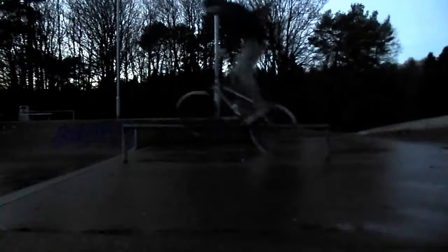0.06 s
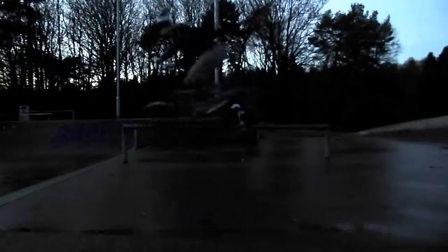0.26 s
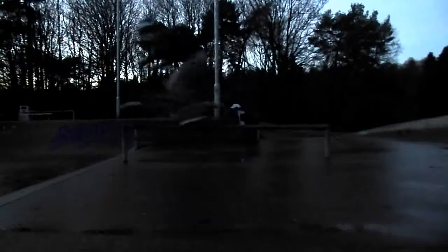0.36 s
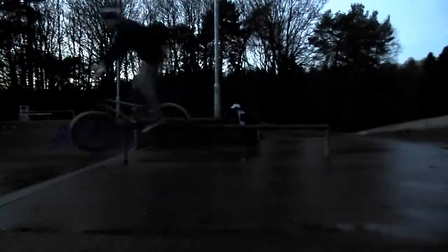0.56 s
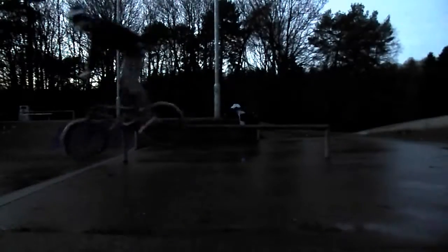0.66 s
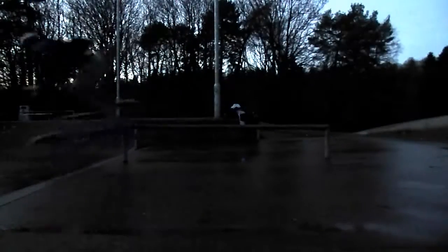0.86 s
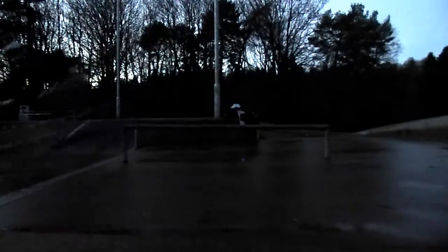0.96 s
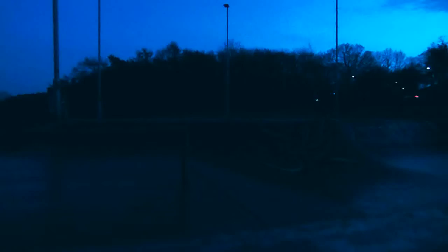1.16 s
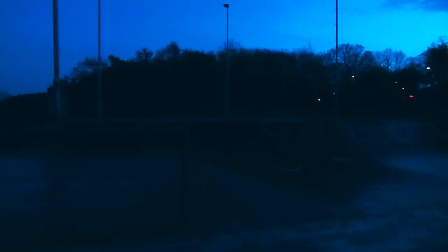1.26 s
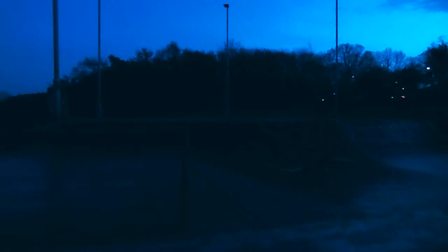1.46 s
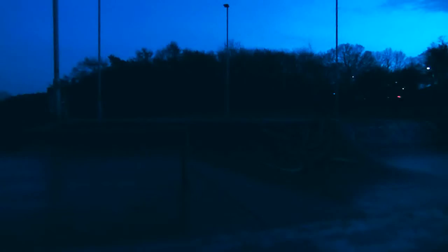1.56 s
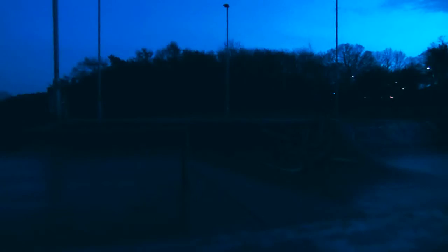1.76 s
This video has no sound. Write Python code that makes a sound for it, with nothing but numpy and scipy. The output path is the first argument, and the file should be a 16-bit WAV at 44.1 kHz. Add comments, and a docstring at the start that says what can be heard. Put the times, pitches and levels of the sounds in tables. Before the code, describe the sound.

Bike pegs strike a steel rail with a sharp clank and a brief ringing rattle in an outdoor skate park. A landing knock follows, with faint freewheel buzz, wet tyre hiss, far traffic and light wind on the microphone.

```python
"""A stunt bike's steel pegs clank onto a steel rail: the front one hits, the rear one lands and chatters.
Each hit thuds in the rail, clanks in the fork or frame and leaves the peg ringing briefly.
The freewheel's pawls buzz before and after; the bike drops off with a knock and hisses away on wet
concrete. Ramps and trees give a weak echo, far traffic hums and a little wind bumps the microphone."""
import sys
import numpy as np
from scipy import signal
from scipy.fft import rfft, irfft, next_fast_len
from scipy.io import wavfile
from scipy.ndimage import map_coordinates

SR = 44100
rng = np.random.default_rng(int(sys.argv[2]) if len(sys.argv) > 2 else 0)


def output_pcm(signal):
    """Save a mono or channel-first signal as 16-bit PCM at the path in sys.argv[1].

    Samples are clipped to [-1, 1] before scaling.
    """
    pcm = np.clip(np.atleast_2d(signal).T, -1, 1) * 32767
    wavfile.write(sys.argv[1], SR, np.round(pcm).astype(np.int16))


N = 79380

# peg hits on the rail: t/s, end of the bike, thud/dB, clank/dB, peg ring/dB, crack/dB
PEG_HITS = [(.213, "front", -22, -13, -19.5, -23.5), (.293, "front", -29.5, -28.5, -34.5, -49),
            (.3245, "rear", -26, -28, -52, -44), (.340, "rear", -28, -13, -20, -14),
            (.3475, "rear", -29.5, -14.5, -22.5, -17), (.353, "rear", -27, -11.5, -20.5, -19),
            (.361, "rear", -20, -15, -17.5, -21), (.369, "rear", -18, -36, -13.5, -34),
            (.376, "rear", -23.5, -28, -16.5, -45), (.3945, "rear", -38, -16, -23, -44),
            (.400, "rear", -22.5, -28, -17.5, -45)]
# ringing modes of rail, fork, frame, steel pegs, and tyre with rim: f/Hz, level/dB, t60/s
RAIL_MODES = [(305.8, -10, 0.3), (364, -10.5, 0.28), (512, -13.5, 0.27), (576, -10.5, 0.56),
              (628, -11, 0.31), (921, -16, .5)]
FORK_MODES = [(295, -0.5, 0.13), (898, -4.5, 0.086), (1130, -9.5, 0.13), (1366, -4, .035),
              (1676, -10, 0.12)]
FRAME_MODES = [(936, -19, .11), (1160, -8.5, 0.17), (1386, -11.5, 0.095), (1565, -12.5, .1),
               (1696, -12.5, 0.088), (1832, -12, 0.073)]
FRONT_PEG_MODES = [(3193, 0, 0.45), (3262, -3.5, 0.4), (3460, -7, .12), (3585, -5, 0.25),
                   (8820, -8.5, 0.25), (9000, -15, 0.2)]
REAR_PEG_MODES = [(3146, -10.5, 0.4), (3180, -10.5, 0.71), (3231, -1.5, .27), (3365, -3.5, 0.12),
                  (3570, -8.5, 0.28), (3680, -13, 0.11), (3784, -11, 0.1), (4278, -8.5, 0.073),
                  (9090, -19.5, .16)]
WHEEL_MODES = [(560, -6, .007), (1090, -1, .005), (3100, -1, .003)]
# low, mid and bright noise layers of a hit: f/Hz, level/dB
THUD_COLOUR = [(40, -14), (170, -9), (290, -2), (600, 4), (900, 2), (3000, -51)]
CLANK_COLOUR = [(200, -37), (700, -8), (1000, -2.5), (1400, -0.5), (2200, -5), (4500, -17.5), (9000, -30.5)]
CRACK_COLOUR = [(250, -7), (2600, -9), (3400, 6.5), (4300, 2), (5200, -5), (7400, -16.5), (9400, -3),
                (10800, -14.5), (13000, -13)]
# wheels touching down: t/s, level/dB
LANDING_KNOCKS = [(1.0487, -13.5), (1.065, -23)]
# frame shudder on landing: f/Hz, level/dB
SHUDDER_COLOUR = [(150, -39), (480, 5), (1300, -3), (8000, -42)]
# freewheel buzz before and after the rail: t/s, level/dB
COAST_IN_LEVEL = [(0, -43.5), (.07, -36.5), (.11, -39), (.15, -46), (.17, -32), (.21, -52)]
COAST_OUT_LEVEL = [(.56, -44.5), (.83, -63.5), (.89, -41), (.93, -39.5), (1.005, -36), (1.07, -36),
                   (1.11, -37), (1.19, -42), (1.3, -45.5), (1.52, -42.5)]
# ring of the hub under each click: f/Hz, level/dB
HUB_COLOUR = [(500, -39), (1500, -22), (2650, -8.5), (2950, -1.5), (3150, 3.5), (3380, -2), (4500, -15.5),
              (7000, -18.5), (9200, -9), (13000, -15.5)]
# hiss of wet tyres, spinning and then rolling away: t/s, level/dB
SPIN_LEVEL = [(0, -56), (.15, -46.5), (.19, -36), (.28, -41), (.33, -33), (.51, -36.5), (.56, -45),
              (.64, -38), (.78, -40.5), (.82, -45), (.92, -40.5), (1.1, -56.5)]
ROLL_LEVEL = [(1.03, -52), (1.075, -34.5), (1.11, -41), (1.17, -42.5), (1.21, -39), (1.38, -43),
              (1.435, -35.5), (1.48, -43.5), (1.62, -44), (1.8, -52.5)]
# tone of those two hisses: f/Hz, level/dB
SPIN_HISS_COLOUR = [(100, -24), (700, 2), (1600, -0.5), (3200, 7.5), (5000, -2), (7200, -6), (9800, 2.5),
                    (12500, -8.5)]
ROLL_HISS_COLOUR = [(200, -25), (1400, -11), (2600, 0), (5600, 3), (7000, -0.5), (8700, 1), (12500, -6.5)]
# swell of the traffic bed: t/s, level/dB
TRAFFIC_LEVEL = [(0, -40.5), (.9, -42), (1.45, -38), (1.6, -42.5), (1.8, -42.5)]
# wind bumps: t/s, half length/s, level/dB
WIND_PUFFS = [(0.686, .035, -50.5), (1.192, 0.017, -49.5), (1.312, 0.042, -46), (1.474, 0.047, -42),
              (1.545, 0.078, -45)]
# traffic hum and wind rumble: f/Hz, level/dB
TRAFFIC_COLOUR = [(25, -66), (60, -17.5), (300, -12.5), (550, -8.5), (950, 1), (1700, -7.5), (2500, -16.5),
                  (12000, -58)]
WIND_COLOUR = [(25, -25), (150, -1), (250, -7.5), (450, -11.5), (1200, -39)]


def pegs_on_rail(attack_s=0.00035, bass_cut_hz=166):
    """Each hit layers a rail thud, a fork or frame clank, a fluttering peg ring and a bright crack."""
    out, t = np.zeros(N), clock()[:N // 2]
    snap = 1 + amp(1) * fade(t, t60=0.014)  # extra force at the instant of contact
    for s, end, thud_db, clank_db, peg_db, crack_db in PEG_HITS:
        tubes, peg = (FORK_MODES, FRONT_PEG_MODES) if end == "front" else (FRAME_MODES, REAR_PEG_MODES)
        thud = steel_ring(RAIL_MODES, t) + amp(-2.5) * burst(THUD_COLOUR, t, t60=0.13)
        clank = steel_ring(tubes, t) + amp(-2) * snap * burst(CLANK_COLOUR, t, t60=0.051)
        flutter = unit(amp(2 * wobble(per_s=70)))[:len(t)]
        ping = flutter * steel_ring(peg, t, sag=0.0029)
        crack = snap * burst(CRACK_COLOUR, t, t60=0.099)
        hit = amp(thud_db) * thud + amp(clank_db) * clank + amp(peg_db) * ping + amp(crack_db) * crack
        add(out, s, hit * (1 - np.exp(-t / attack_s)))
    # the hits carry little bass
    return signal.sosfilt(signal.butter(3, bass_cut_hz, "high", fs=SR, output="sos"), out)


def steel_ring(modes, t, sag=0, detune=0.0016, scatter_db=1, waver_per_s=70):
    """Damped modes, shifted at each hit as the contact slides; the loose contact makes them waver."""
    out, knots = np.zeros(len(t)), np.arange(waver_per_s) / waver_per_s
    # a pressed peg rings sharp by the share `sag` and settles as its load lifts
    bent_time = t + sag * np.cumsum(fade(t, t60=0.41)) / SR
    for hz, db, t60 in modes:
        depth_rad = 0.5 * np.sqrt(hz / 1000)  # high modes waver most
        waver = np.interp(t, knots, depth_rad * rng.standard_normal(len(knots)))
        pitch_hz = hz * (1 + detune * rng.normal())
        phase = 2 * np.pi * (pitch_hz * bent_time + rng.random()) + waver
        out += amp(db + scatter_db * rng.normal()) * fade(t, t60) * np.sin(phase)
    return out


def landing(low_cut_hz=330, rubber_hz=4930):
    """The wheels clack lightly on concrete and the frame shudders; the rubber softens the top end."""
    out, t = np.zeros(N), clock()[:N // 8]
    knock = sum(amp(db) * fade(t, t60) * np.cos(2 * np.pi * hz * t) for hz, db, t60 in WHEEL_MODES)
    for s, db in LANDING_KNOCKS:
        shudder = amp(-17) * burst(SHUDDER_COLOUR, t, t60=0.039)
        add(out, s, amp(db) * (knock + shudder))
    return signal.sosfilt(signal.butter(2, [low_cut_hz, rubber_hz], "band", fs=SR, output="sos"), out)


def freewheel(coast, treble_db, click_t60, clicks_per_s=110, scatter_db=1.2):
    """The pawls click into the hub as the wheel coasts, fast enough to buzz."""
    t = clock()
    teeth = t * clicks_per_s
    accents = amp(scatter_db * rng.standard_normal(1024))[teeth.astype(int)]
    since_click = teeth % 1 / clicks_per_s
    clicks = unit(accents * fade(since_click, click_t60))
    hub = noise([(hz, db + treble_db * (hz > SR / 8)) for hz, db in HUB_COLOUR])
    gate = (t >= coast[0][0]) & (t <= coast[-1][0])
    return clicks * hub * level(coast) * gate


def tyre_hiss(curve, colour, grain_db=1.95):
    """Wet rubber turning: a hiss with a fine grain."""
    return level(curve) * unit(noise(colour) * amp(grain_db * wobble(per_s=270)))


def park_echo(hits, t60=0.42):
    """Ramps and trees throw back a short, diffuse tail."""
    tail = rng.standard_normal(N) * fade(clock(), t60)
    return signal.fftconvolve(hits, tail / np.linalg.norm(tail))[:N]


def traffic(waver_db=0.44):
    """Far traffic lays a gently wavering hum under everything."""
    return level(TRAFFIC_LEVEL) * amp(waver_db * wobble(per_s=11.94)) * noise(TRAFFIC_COLOUR)


def wind():
    """Soft puffs bump the microphone with a low rumble."""
    puffs = sum(amp(db) * np.exp(-((clock() - s) / half) ** 2) for s, half, db in WIND_PUFFS)
    return puffs * noise(WIND_COLOUR)


def amp(db):
    """Decibels to gain."""
    return 10 ** (np.asarray(db) / 20)


def unit(x):
    """Scale to rms 1."""
    return x / np.sqrt(np.mean(x ** 2) + 1e-20)


def clock():
    """Time of each sample in seconds."""
    return np.arange(N) / SR


def noise(colour):
    """Noise of rms 1, shaped by f/Hz, level/dB points."""
    hz, db = np.transpose(colour)
    bins_hz = np.fft.rfftfreq(N, 1 / SR)
    eq = amp(np.interp(np.log(bins_hz + 1), np.log(hz), db))
    return unit(irfft(rfft(rng.standard_normal(N)) * eq, N))


def burst(colour, t, t60):
    """A noise burst: dense modes that die together."""
    return noise(colour)[:len(t)] * fade(t, t60)


def level(points):
    """Gain envelope through t/s, level/dB points."""
    return amp(np.interp(clock(), *np.transpose(points)))


def wobble(per_s):
    """A smooth random curve with per_s knots a second."""
    return map_coordinates(rng.standard_normal(512), [clock() * per_s], mode="wrap")


def fade(t, t60):
    """Decay by 60 dB every t60 seconds."""
    return np.exp(-np.log(1000) * t / t60)


def add(track, s, sound):
    """Mix a sound in at s seconds."""
    part = track[round(s * SR):][:len(sound)]
    part += sound[:len(part)]


def scene():
    """Mono mix: hits and their echo up front, then freewheel and tyres, over traffic and wind."""
    hits = pegs_on_rail() + landing()
    echo = amp(-12.5) * park_echo(hits)
    coast_in = freewheel(COAST_IN_LEVEL, treble_db=1, click_t60=0.03)
    # further off, the clicks are duller and smeared by reflections
    coast_out = freewheel(COAST_OUT_LEVEL, treble_db=-6.5, click_t60=0.087)
    tyres = tyre_hiss(SPIN_LEVEL, SPIN_HISS_COLOUR) + tyre_hiss(ROLL_LEVEL, ROLL_HISS_COLOUR)
    return (hits + echo + coast_in + coast_out + tyres + traffic() + wind())[None]


def record(dry, ceiling=0.85, top_hz=12550):
    """Round off the highest peaks and cut everything above top_hz."""
    soft = dry / (1 + (dry / ceiling) ** 6) ** (1 / 6)
    padded = next_fast_len(N + SR // 2)
    passband = np.fft.rfftfreq(padded, 1 / SR) < top_hz
    return irfft(rfft(soft, padded) * passband, padded)[..., :N]


dry = scene()
out = record(dry)
output_pcm(out)
```